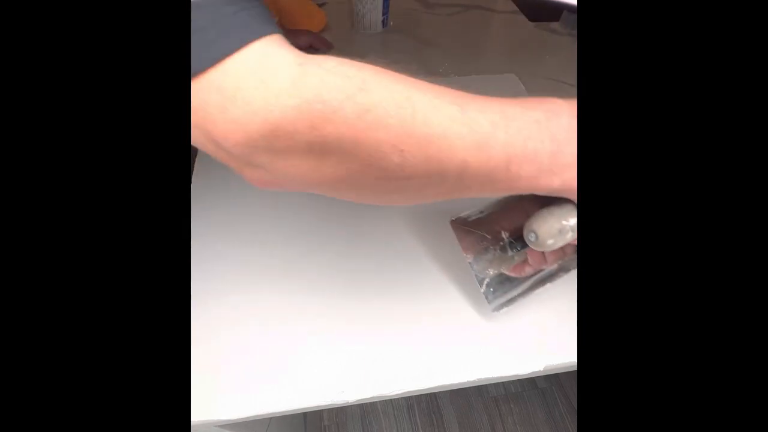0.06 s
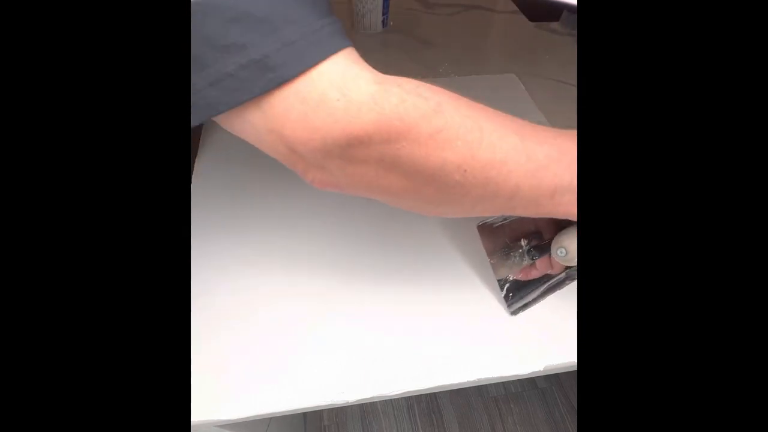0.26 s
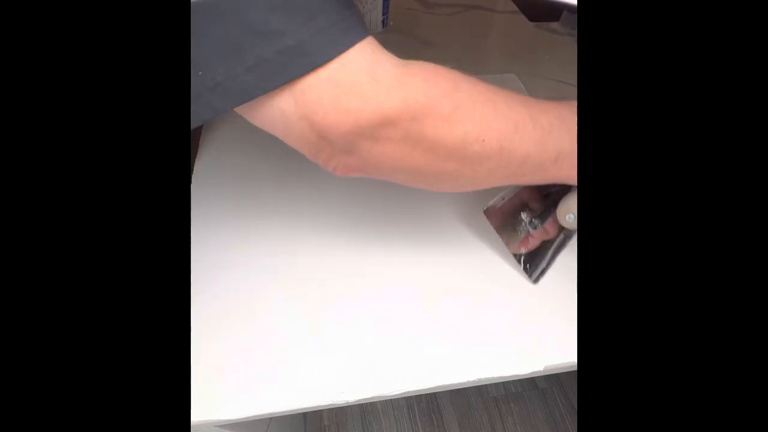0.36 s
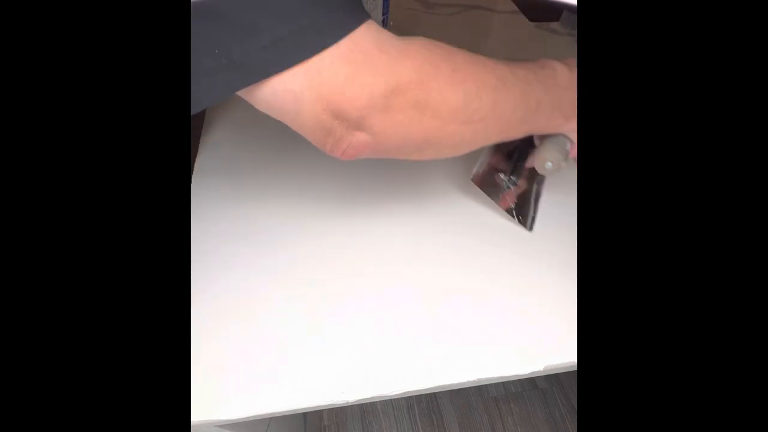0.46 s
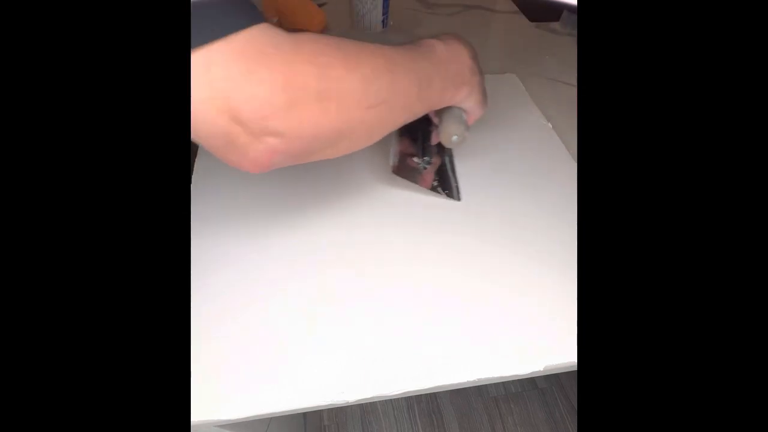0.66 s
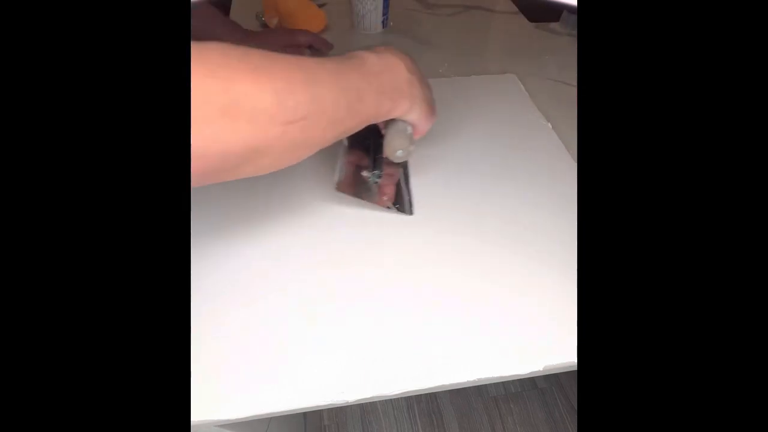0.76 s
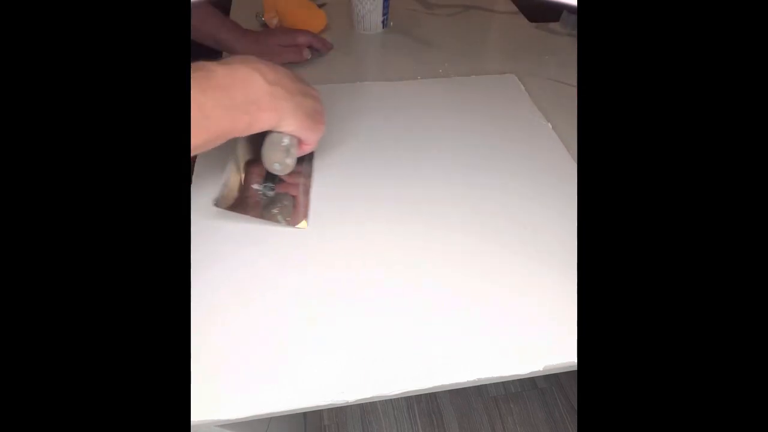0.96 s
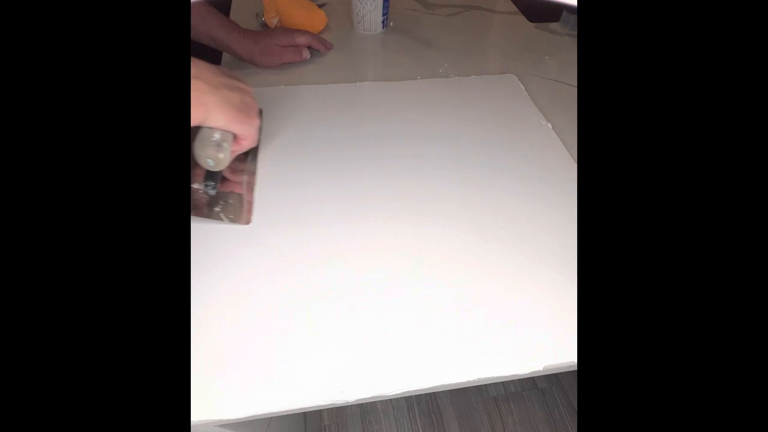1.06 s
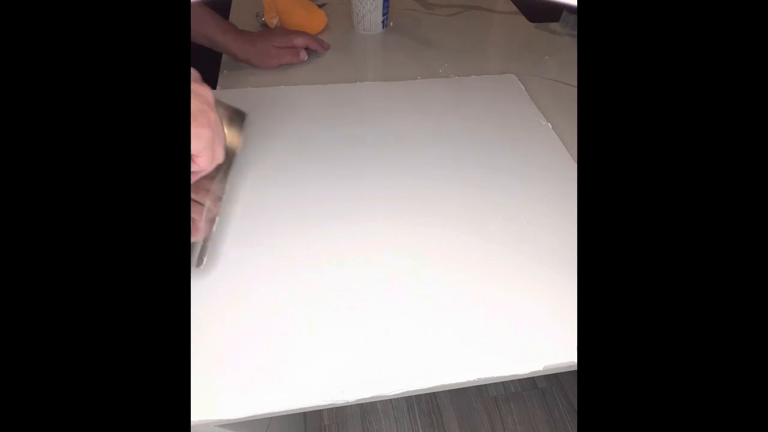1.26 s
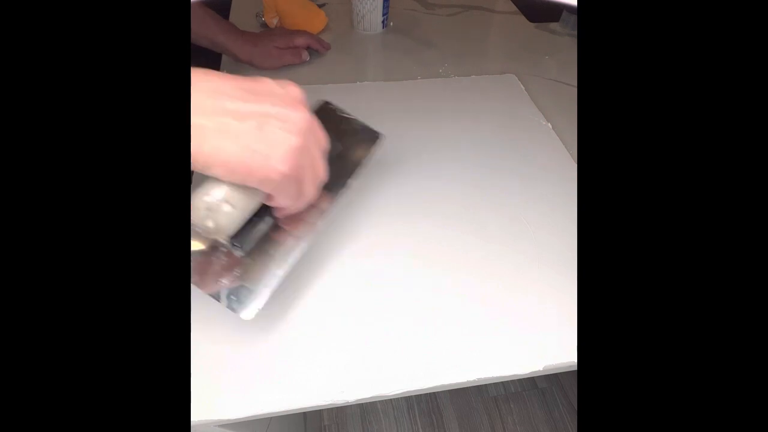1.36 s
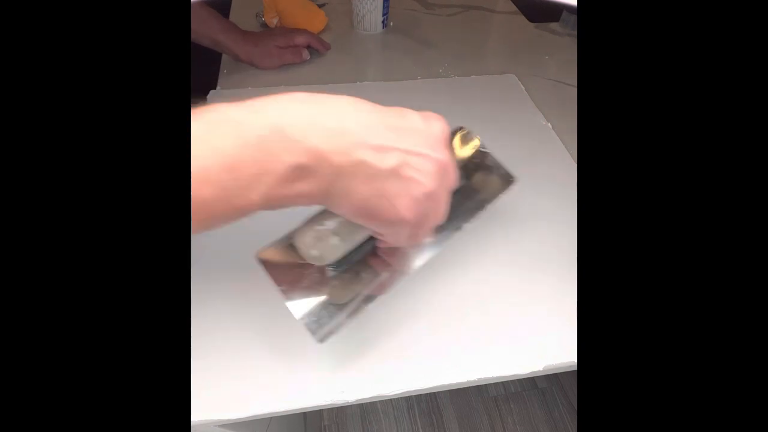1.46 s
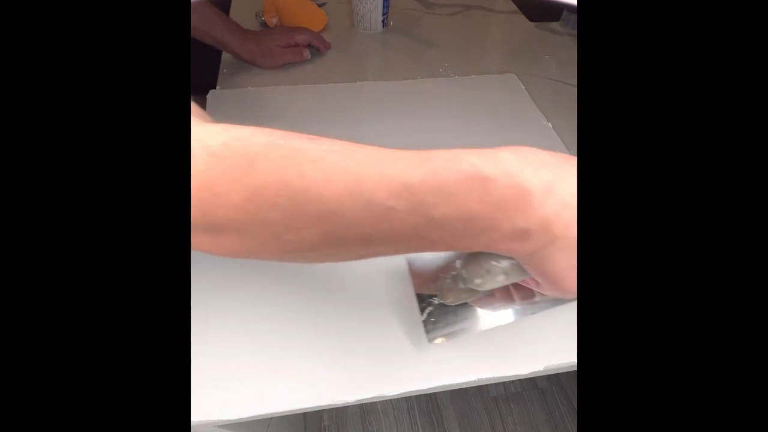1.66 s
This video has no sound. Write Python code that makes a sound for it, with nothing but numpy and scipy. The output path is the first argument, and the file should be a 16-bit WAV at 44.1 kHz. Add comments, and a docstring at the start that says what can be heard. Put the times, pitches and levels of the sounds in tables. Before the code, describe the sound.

Metal blade lands with a knock, rasps about a second over wet plaster, fades and lifts

```python
"""In a hard, humming room a steel trowel lands on a board of wet plaster, makes one long stroke and is lifted.
The stroke starts on the right and then leans left. Dense random grains under the edge excite the modes of the
damped blade and board and a broad rasp; short knocks ring the same body. Noise decaying band by band is the
room's reverberation, over machine hum, rumble, the dying hiss of the stroke before and a late thin whistle."""
import sys
import numpy as np
from scipy import signal
from scipy.fft import rfft, irfft
from scipy.io import wavfile
from scipy.ndimage import uniform_filter1d

SR = 44100
rng = np.random.default_rng(int(sys.argv[2]) if len(sys.argv) > 2 else 0)


def wrap_up_sound(samples):
    """Save the sound to the file named by the first command line argument, as 16-bit audio."""
    columns = np.atleast_2d(samples).T
    # keep every value between -1 and 1, then stretch to whole-number steps
    tamed = np.clip(columns, -1, 1)
    steps = np.round(tamed * 32767).astype(np.int16)
    wavfile.write(sys.argv[1], SR, steps)


N = 74970


def undb(db):
    """Level definition: decibels to an amplitude ratio."""
    return 10 ** (np.asarray(db) / 20)


def unit(x):
    """Normalisation to an RMS of one."""
    return x / np.sqrt(np.mean(x ** 2))


def seconds():
    """Uniform sampling: the time of every sample."""
    return np.arange(N) / SR


def curve(table, col):
    """Linear interpolation of one column of a time table, sample by sample."""
    rows = np.array(table)
    return np.interp(seconds(), rows[:, 0], rows[:, col])


def shade(x, points):
    """Linear filtering in the frequency domain, through (Hz, dB) points on a log frequency axis."""
    rows = np.array(points)
    hz = np.maximum(np.arange(N // 2 + 1) * SR / N, 1)
    gain = undb(np.interp(np.log(hz), np.log(rows[:, 0]), rows[:, 1]))
    gain = gain * np.minimum(hz / rows[0, 0], 1) ** 3  # steep fall below the first point
    return irfft(rfft(x) * gain, N)


def ring(x, hz, width_hz):
    """Damped resonance: a pole pair with gain near 1 at its centre."""
    r = np.exp(-np.pi * width_hz / SR)
    return signal.lfilter([1 - r, 0, r - 1], [1, -2 * r * np.cos(2 * np.pi * hz / SR), r * r], x)


def walk(rate):
    """Slow random modulation: levels drawn rate times a second and smoothed, with an RMS of one."""
    k = int(SR / rate)
    steps = np.repeat(rng.standard_normal(N // k + 1), k)
    return unit(uniform_filter1d(uniform_filter1d(steps, k), k)[:N])


def tone(hz):
    """Frequency modulation: a sine of RMS one whose phase is the running sum of its frequency."""
    return np.sqrt(2) * np.sin(2 * np.pi * np.cumsum(hz) / SR)


def spread(mid, side, width):
    """Mid-side stereo: a shared part, plus a shaded part of opposite sign left and right."""
    return mid + np.array([[1], [-1]]) * shade(side, [(0.74, -33)] + list(width))


# hum lines of a machine: pitch_hz [Hz], level_db [dB RMS, about which it wavers]
HUM_LINES = [(58, -58), (122, -72), (236, -66.5), (465, -64)]
HUM_WAVER_DB, HUM_WAVER_HZ = 1.5, 1.5


def machine_hum():
    """Line spectrum: steady sines whose level and pitch waver slightly."""
    total = np.zeros(N)
    for pitch_hz, level_db in HUM_LINES:
        level = undb(level_db + HUM_WAVER_DB * walk(10))
        total += level * tone(pitch_hz + HUM_WAVER_HZ * walk(7.9))
    return total


# spectrum of the room rumble: pitch_hz [Hz], level_db [dB per Hz, relative]
RUMBLE_SPECTRUM = [(26, -26), (45, -7), (163, -3.5), (198, -5.5), (235, -3.5), (322, -8), (347, -8),
                   (431, -16), (464, -10), (499, -16.5), (564, -15.5), (736, -20.5), (852, -18),
                   (1770, -35.5), (15000, -68)]
# stereo width of the background: pitch_hz [Hz], side_gain_db [dB]
BACKGROUND_WIDTH = [(60, -19), (110, -14.5), (200, -21.5), (380, -8.5), (700, 0.5), (1290, 2), (2380, -17),
                    (4400, -3.5), (8120, 6), (15000, 1)]
RUMBLE_DB = -51  # RMS, before the shared part is trimmed by 1 dB and the side part shaded


def background():
    """Broadband noise and line spectrum: coloured room rumble, with the hum common to both sides."""
    noise = shade(rng.standard_normal((2, N)), RUMBLE_SPECTRUM)
    noise = noise * undb(RUMBLE_DB) / np.std(noise[0])
    return spread(noise[0] * undb(-1) + machine_hum(), noise[1], BACKGROUND_WIDTH)


# spectrum of the hiss left by the stroke before: pitch_hz [Hz], level_db [dB per Hz, relative]
EARLIER_SPECTRUM = [(880, -47), (1500, -17), (2150, -8.5), (2300, -8), (3800, -14), (4690, -9), (6470, -17),
                    (7750, -16), (12000, -27), (14500, -29)]
EARLIER_START_DB, EARLIER_T60_S = -71.5, 3.4


def earlier_stroke():
    """Exponential decay: the room still hisses from the stroke before, falling 60 dB per T60."""
    fade = np.exp(-np.log(1000) * seconds() / EARLIER_T60_S)
    hiss = unit(shade(rng.standard_normal((2, N)), EARLIER_SPECTRUM))
    return undb(EARLIER_START_DB) * hiss * fade


# wandering thin whistle: time_s [s], pitch_hz [Hz], level_db [dB RMS, about which it flickers]
WHISTLE_PATH = [(1.24, 14000, -100), (1.256, 14350, -78), (1.285, 14600, -90), (1.3, 14250, -84),
                (1.36, 14150, -80), (1.4, 13750, -92), (1.425, 13800, -95), (1.45, 14900, -75),
                (1.475, 14450, -80), (1.5, 14900, -78), (1.53, 15450, -88), (1.55, 15300, -100),
                (1.563, 15050, -78), (1.58, 14300, -76), (1.6, 13400, -92), (1.62, 13200, -110)]
WHISTLE_WOBBLE_HZ = 70


def whistle():
    """Frequency modulation: a faint, high, slightly rough tone, a shade to the left."""
    t = seconds()
    sounding = (t > WHISTLE_PATH[0][0]) * (t < WHISTLE_PATH[-1][0])
    hz = curve(WHISTLE_PATH, 1) + WHISTLE_WOBBLE_HZ * walk(300)
    level = undb(curve(WHISTLE_PATH, 2) + 2 * walk(60))
    return sounding * level * tone(hz) * undb(np.array([[.6], [-.6]]))


# reverberation time of the hard room: pitch_hz [Hz], t60_s [s]
REVERB_TIMES = [(300, 1.7), (1500, 1.15), (3000, 1.29), (6000, 0.83), (8000, 0.58), (11000, 0.24),
                (16000, 0.18)]
ROOM_DB = -11.5  # energy of the tail against a unit impulse


def room(x):
    """Diffuse reverberation: convolution with noise decaying band by band, unrelated left and right."""
    t, rows = seconds(), np.array(REVERB_TIMES)
    tail = np.zeros((2, N))
    for hz in 250 * 2 ** np.arange(0, 6.1, .5):  # half-octave steps
        t60_s = np.interp(np.log(hz), np.log(rows[:, 0]), rows[:, 1])
        band = ring(ring(rng.standard_normal((2, N)), hz, hz / 2), hz, hz / 2)
        tail += band * np.exp(-np.log(1000) * t / t60_s)
    tail = tail * np.clip(t / 0.03, 0, 1)  # builds up over 30 ms
    tail = tail / np.sqrt(np.sum(tail ** 2) / 2)
    return undb(ROOM_DB) * signal.fftconvolve(x, tail, axes=1)[:, :N]


GRIT_PER_S, GRIT_SPREAD_DB, PATCHY_DB = 22000, 1.0, .3


def grit():
    """Random impulse excitation: dense grains of uneven size crushed under the edge."""
    hit = rng.random(N) < GRIT_PER_S / SR
    size = undb(GRIT_SPREAD_DB * rng.exponential(size=N) + PATCHY_DB * walk(40))
    return unit(hit * rng.standard_normal(N) * size)


FOCUS_OCTAVES, FOCUS_DB = .2, 7


def resonances(x, table, focus_hz, flex, lift_db=FOCUS_DB):
    """Superposition: parallel resonances, lifted near the focus and varied by flex in dB."""
    total = np.zeros(N)
    for (hz, level_db, width_hz), flex_db in zip(table, flex):
        distance = np.log2(hz / focus_hz) / FOCUS_OCTAVES
        gain = undb(level_db + flex_db + lift_db * np.exp(-.5 * distance ** 2))
        total += gain * ring(x, hz, width_hz)
    return total


# low modes of blade and board: pitch_hz [Hz], level_db [dB, relative], width_hz [Hz]
BODY_MODES = [(496, -42.5, 33), (635, -1, 23), (745.7, 3, 45), (811, 4, 25), (876, 1, 35), (943, 2, 98),
              (1055, 6, 54), (1151, 8.5, 33), (1310, 0.5, 55), (1500, -26, 19), (1630, -23.5, 31),
              (1530, -37, 27)]


def body_ring(x, focus_hz, flex, lift_db=FOCUS_DB):
    """Modal superposition: the low resonances of the damped blade and board."""
    return resonances(x, BODY_MODES, focus_hz, flex, lift_db)


# knocks of the blade on the board: start_s [s, push centre], level_db [dB, peak less 3],
# length_s [s, two standard deviations of the push], pitch_hz [Hz, struck most]
BLADE_KNOCKS = [(0.24, -34.5, 0.0085, 740), (0.248, -43.5, 0.0046, 330), (0.662, -39, 0.014, 1101),
                (0.761, -43, 0.024, 753), (1.074, -42, .006, 280), (1.084, -39, 0.0043, 480.6),
                (1.111, -45, 0.0063, 753), (1.182, -44, .004, 540)]


def knocks():
    """Impact excitation: short Gaussian pushes ring the body modes near their pitch."""
    t, out = seconds(), np.zeros(N)
    for start_s, level_db, length_s, hz in BLADE_KNOCKS:
        envelope = np.exp(-.5 * ((t - start_s) / (length_s / 2)) ** 2)
        push = envelope * (np.sin(2 * np.pi * hz * t) + 0.48 * rng.standard_normal(N))
        rung = body_ring(push, hz, np.zeros(len(BODY_MODES))) + 0.12 * ring(push, hz, hz / 2)
        out += np.sqrt(2) * undb(level_db) * rung / np.max(np.abs(rung))
    return out


# where the sound is strongest as the contact point moves along the stroke: time_s [s],
# low_pitch_hz [Hz], low_lift_db [dB], upper_pitch_hz [Hz], high_pitch_hz [Hz]
CONTACT_FOCUS = [(.24, 780, 4, 2200, 7000), (.32, 780, 1.5, 2200, 7300), (.42, 950, 3, 2140, 6850),
                 (.52, 940, 6.5, 2680, 6560), (.6, 990, 1, 2300, 6500), (.66, 1050, 6.5, 2280, 4960),
                 (.69, 1020, 6, 2270, 4100), (.77, 780, 6, 2270, 6400), (.9, 1070, 4, 2400, 6560),
                 (1.0, 1150, 11, 2000, 7000), (1.08, 720, 10.5, 1980, 6540), (1.18, 610, 14, 2210, 6840)]


def contact(col):
    """Position-dependent excitation: one column of the focus as the contact point moves."""
    return curve(CONTACT_FOCUS, col)


def low_ring(grains, flex):
    """Modal response to grit: low modes, evened out by their running RMS over 0.2 s."""
    body = body_ring(grains, contact(1), flex, contact(2))
    return body / np.sqrt(uniform_filter1d(body ** 2, size=SR // 5))


# upper modes: pitch_hz [Hz], level_db [dB, relative], width_hz [Hz]
UPPER_MODES = [(2090, 3, 450), (2287, 10.5, 37), (2508, 5.5, 120), (2670, 3, 120), (2786, 4.5, 180),
               (3040, 5, 170)]


def upper_ring(grains, flex):
    """Modal response to grit: the upper resonances."""
    return unit(resonances(grains, UPPER_MODES, contact(3), flex))


# spectrum of the broad rasp: pitch_hz [Hz], level_db [dB per Hz, relative]
RASP_SPECTRUM = [(880, -25), (1500, 2), (1750, 2), (2280, -7.5), (2740, -11.5), (3820, -0.5), (4220, -10.5),
                 (5360, -2), (6410, -1), (7950, 4.5), (9500, -9), (12400, -33), (20900, -120)]
# narrow bright bands of treble, reflected from the table, shifting as the blade moves:
# pitch_hz [Hz], level_db [dB, relative], width_hz [Hz]
SHEEN_BANDS = [(4235, 6, 230), (4760, 1, 300), (5900, -8, 180), (6395, 3, 620), (7030, -1.5, 86),
               (7770, -3, 86), (8400, -6.5, 130)]
SHEEN_DB = -6  # bright bands against the rasp


def rasp(grains, flex):
    """Spectral shaping and reflection: a broad rasp with narrow bright bands shifting as the blade moves."""
    sheen = unit(resonances(grains, SHEEN_BANDS, contact(4), flex[::-1]))
    return unit(shade(grains, RASP_SPECTRUM)) + undb(SHEEN_DB) * sheen


# top of the rasp: pitch_hz [Hz], level_db [dB per Hz, relative]
FIZZ_SPECTRUM = [(5000, -56), (8500, -9.5), (10100, 2), (15000, 4.5), (15800, -3)]


def fizz(grains):
    """Spectral shaping: the highest hiss of the crushed grains."""
    return unit(shade(grains, FIZZ_SPECTRUM))


def low_rumble(grains):
    """Broad resonance: grit through two equal heavily damped resonators in series."""
    return unit(ring(ring(grains, 448, 450), 448, 450))


# course of the stroke: time_s [s], body_db, upper_db, rasp_db, fizz_db [dB],
# left_minus_right_db [dB], rumble_db [dB]; layer levels are before landing, lift, flicker and stereo
STROKE_COURSE = [(0.236, -38, -52, -45.5, -53, -5, -46), (0.244, -33, -56.5, -55, -53, -8, -53),
                 (0.264, -46, -50, -46.5, -53, 6, -48), (0.284, -39.5, -43.5, -43, -47, -2, -51),
                 (0.372, -34.5, -41, -37.5, -44, 1, -53), (0.414, -35, -41, -39, -42.5, 0.5, -52.5),
                 (0.52, -37, -38, -36.5, -40.5, 1.5, -65), (0.6, -35.5, -44, -40, -45, 1, -53),
                 (0.618, -36, -41, -38.5, -41, 3.5, -50), (0.632, -38.5, -45, -39.5, -43, 1.5, -51),
                 (0.656, -35, -43, -38.5, -39, 0.5, -68), (0.696, -45, -49.5, -40, -41.5, 2, -52.5),
                 (0.766, -38.5, -55.5, -41.5, -43, 2, -68.5), (0.86, -47.5, -52, -45, -46, 1.5, -57),
                 (0.888, -41, -56, -45, -44.5, 2.5, -64), (0.922, -42.5, -60, -43.5, -50, 2, -48),
                 (0.954, -45, -54, -44.5, -45.5, 1.5, -67), (0.992, -51.5, -57, -47, -46.5, 1, -49),
                 (1.016, -44.5, -49, -48, -48.5, 3, -56.5), (1.056, -52.5, -55, -47, -52, 3, -60),
                 (1.08, -44, -56, -45.5, -45.5, 1.0, -48.5), (1.15, -51, -62.5, -47.5, -53, -1.5, -61.5),
                 (1.17, -47, -57.5, -48, -53, 2.5, -49), (1.2, -51, -52.5, -65, -59, 6, -54.5)]
LAND_S, LIFT_S, LAND_RISE_S, LIFT_FALL_S = .231, 1.185, .007, .015
FLICKER_DB, FLICKER_PER_S = .6, 40


def stroke_level(col):
    """Amplitude modulation: one layer's level between landing and lift, with its own flicker."""
    t = seconds()
    landing = np.clip((t - LAND_S) / LAND_RISE_S, 0, 1)
    lifting = np.exp(-np.maximum(t - LIFT_S, 0) / LIFT_FALL_S)
    return landing * lifting * undb(curve(STROKE_COURSE, col) + FLICKER_DB * walk(FLICKER_PER_S))


# stereo width of the stroke: pitch_hz [Hz], side_gain_db [dB]
STROKE_WIDTH = [(60, -37), (110, -20), (200, -18), (380, -12.5), (700, -0.5), (1290, -2), (2380, -8.5),
                (4400, 2), (8120, -5.5), (15000, -1)]
# spectral balance of the sides: pitch_hz [Hz], left_gain_db [dB]
SIDE_BALANCE = [(60, 0.0), (110, 0.5), (200, 2), (380, -0.64), (700, 0.99), (1290, -1.3), (2380, -1.4),
                (4400, -0.028), (8120, -1.5), (15000, -1)]
LEFT_LAG_S = 2.2e-5


def stereo_image(mid, side):
    """Interaural time and level differences: the left lags slightly, and the balance follows the stroke."""
    left, right = spread(mid, side, STROKE_WIDTH)
    hz = np.arange(N // 2 + 1) * SR / N
    left = irfft(rfft(left) * np.exp(-2j * np.pi * hz * LEFT_LAG_S), N)
    left = shade(left, [(1, 0)] + list(SIDE_BALANCE))
    pan_db = curve(STROKE_COURSE, 5)
    return np.array([left, right]) * undb(np.array([pan_db, -pan_db]) / 2)


FLEX_DB, FLEX_PER_S = 2.5, 12


def trowel():
    """Source-filter principle: grit and knocks excite the blade and board, whose modes swell and fade."""
    flex = [FLEX_DB * walk(FLEX_PER_S) for _ in BODY_MODES]  # each resonance swells and fades
    body_level, upper_level, rasp_level, fizz_level, rumble_level = (stroke_level(k) for k in (1, 2, 3, 4, 6))
    parts = []
    for _ in range(2):  # separate grains for the shared and the unshared part
        grains = grit()
        part = body_level * low_ring(grains, flex)
        part += rumble_level * low_rumble(grains)
        part += upper_level * upper_ring(grains, flex)
        part += rasp_level * rasp(grains, flex)
        part += fizz_level * fizz(grains)
        parts.append(part)
    blows = knocks()
    return stereo_image(parts[0] + blows, parts[1] + .5 * blows)


def scene():
    """Superposition: background, direct sound of the trowel and its reverberation add."""
    blade = trowel()
    return background() + earlier_stroke() + whistle() + room(blade) + blade


TOP_HZ = 15850


def record(dry):
    """Band limitation: the microphone cuts the top with a steep elliptic low-pass."""
    return signal.sosfilt(signal.ellip(10, .2, 75, TOP_HZ, fs=SR, output="sos"), dry)


dry = scene()
out = record(dry)
wrap_up_sound(out)
```